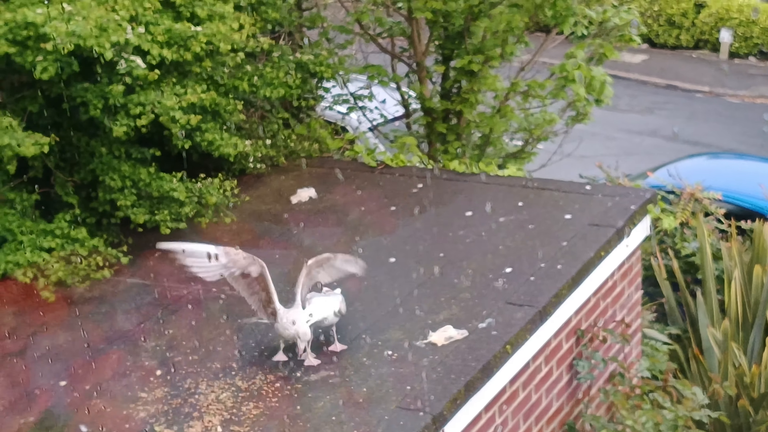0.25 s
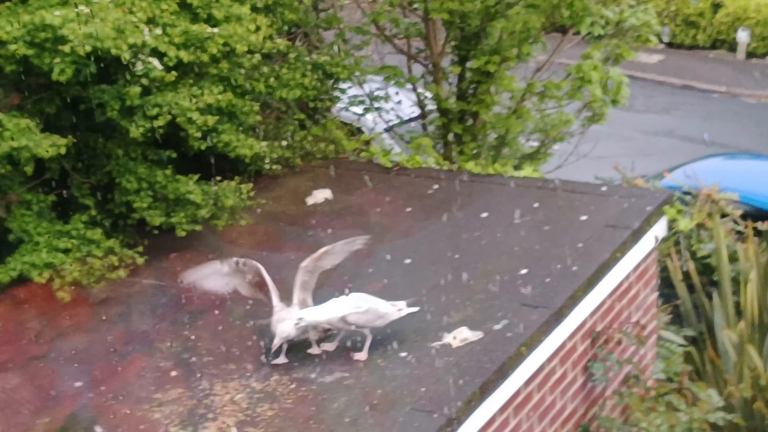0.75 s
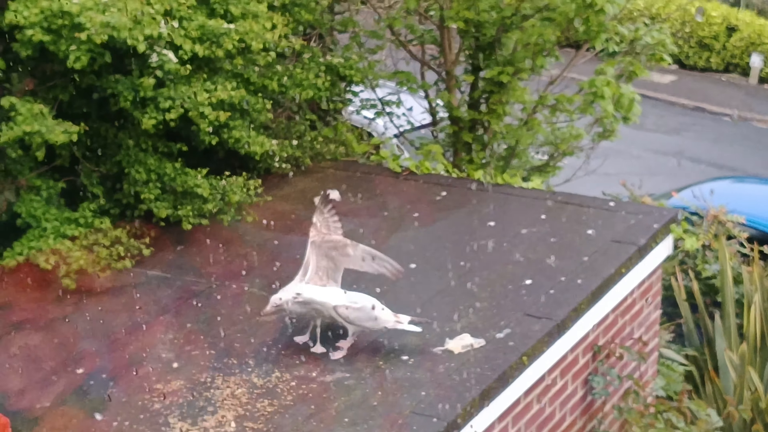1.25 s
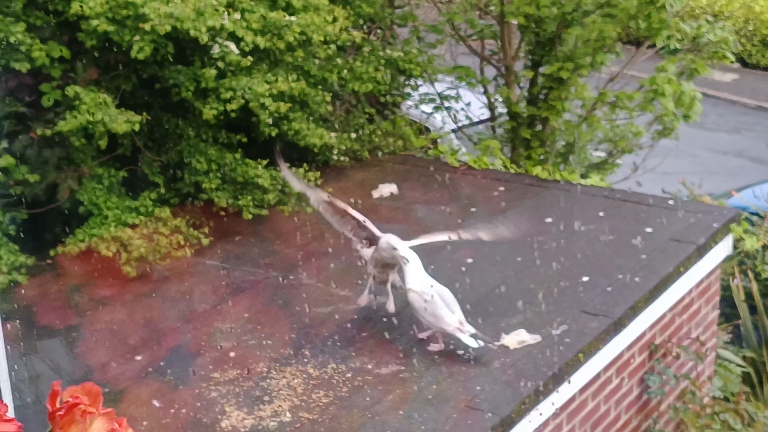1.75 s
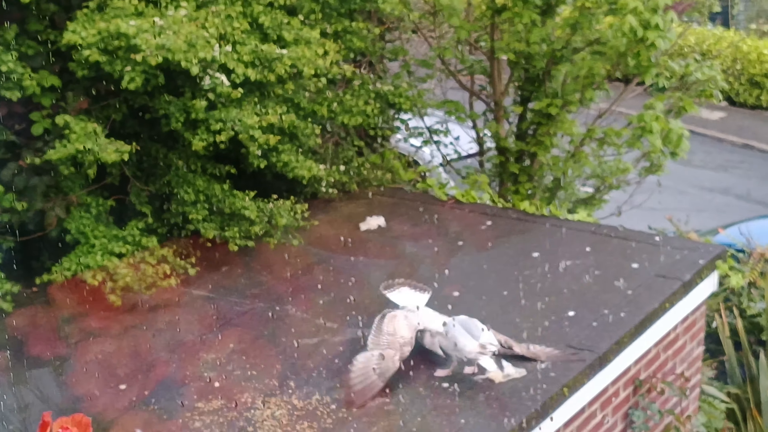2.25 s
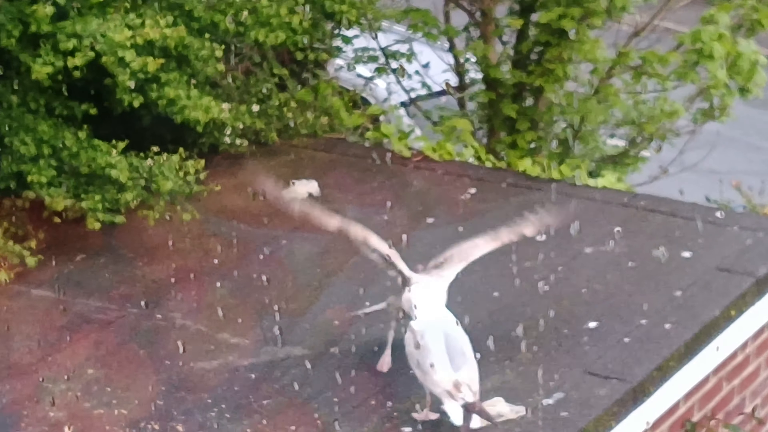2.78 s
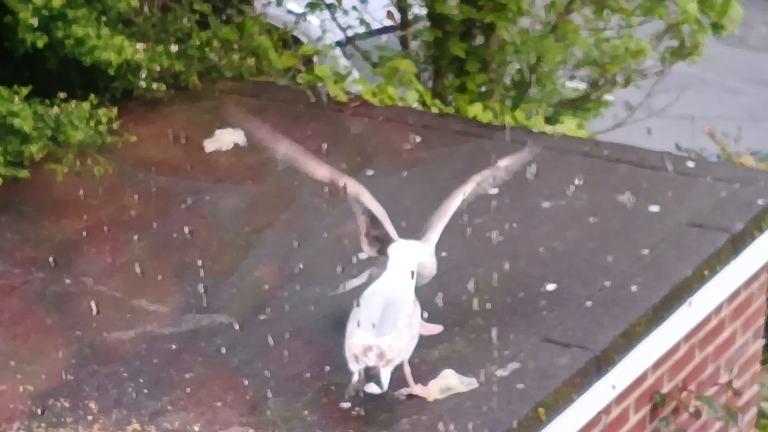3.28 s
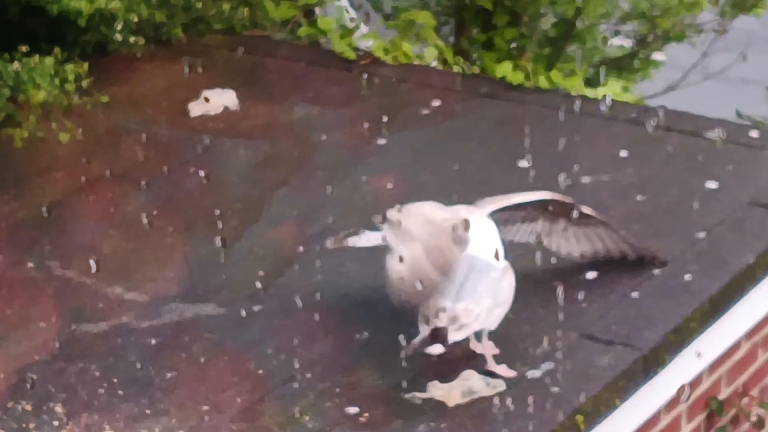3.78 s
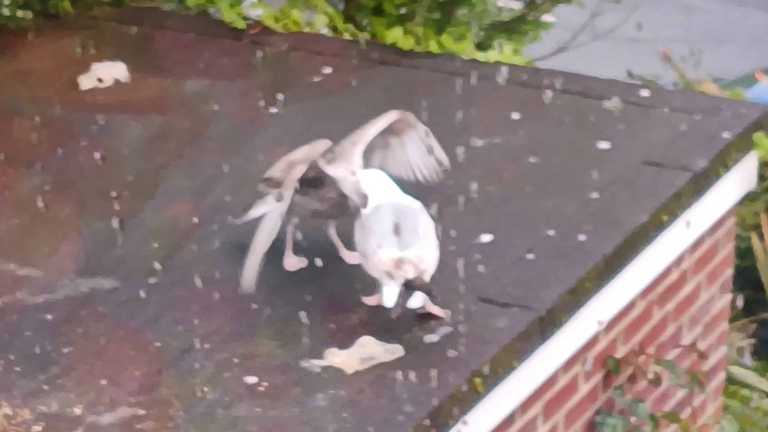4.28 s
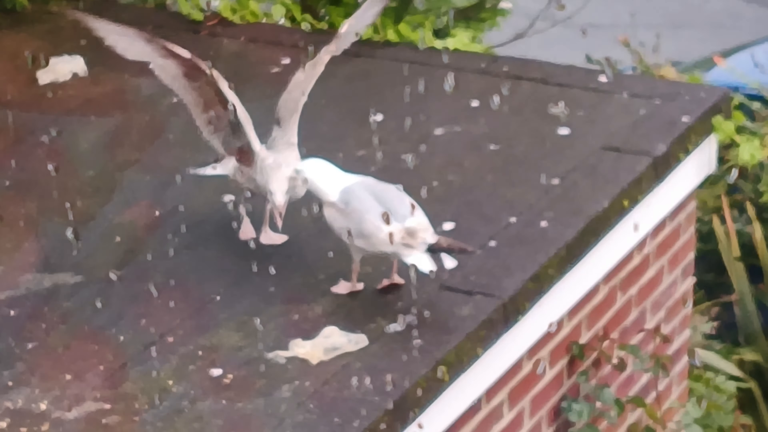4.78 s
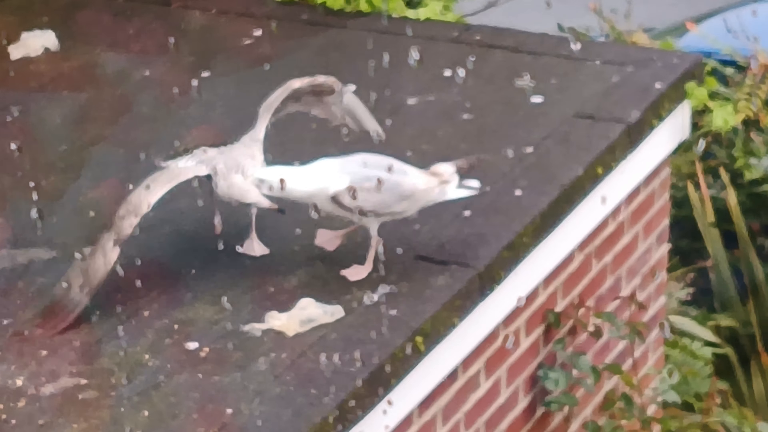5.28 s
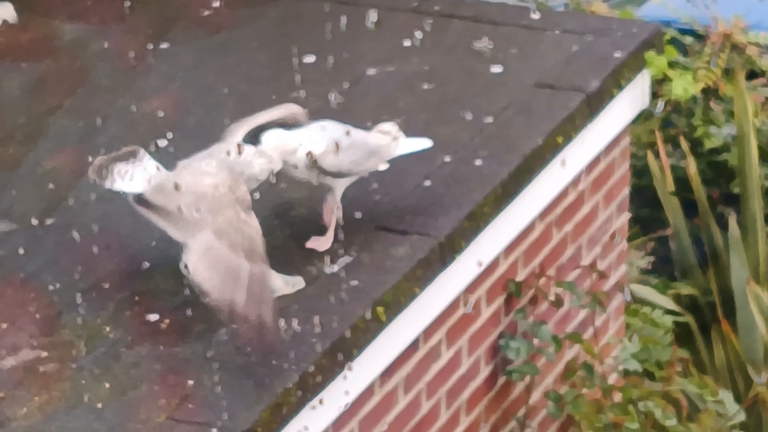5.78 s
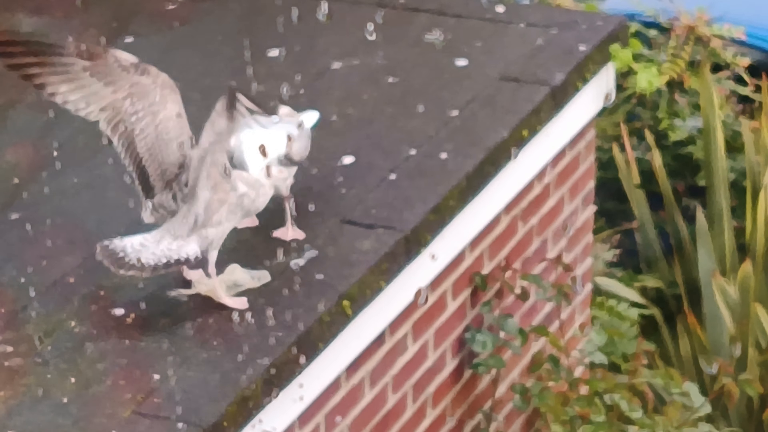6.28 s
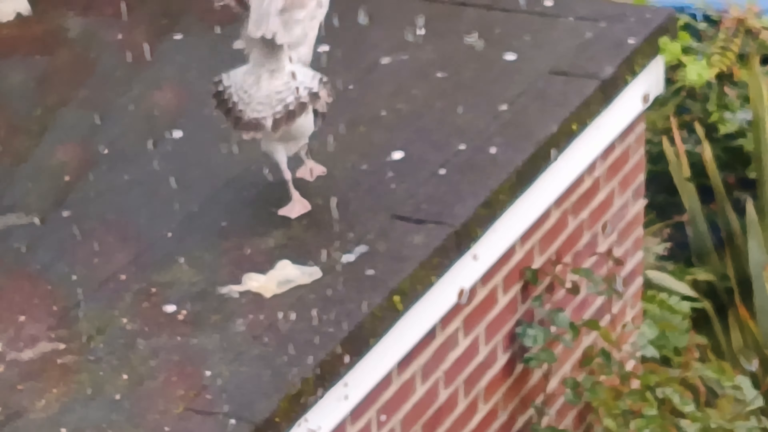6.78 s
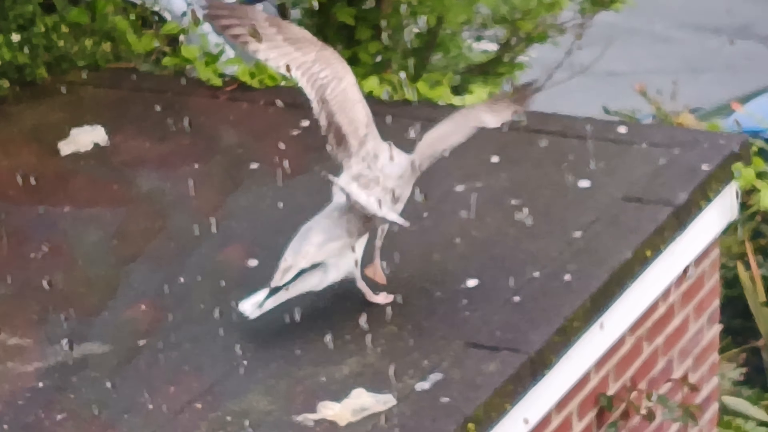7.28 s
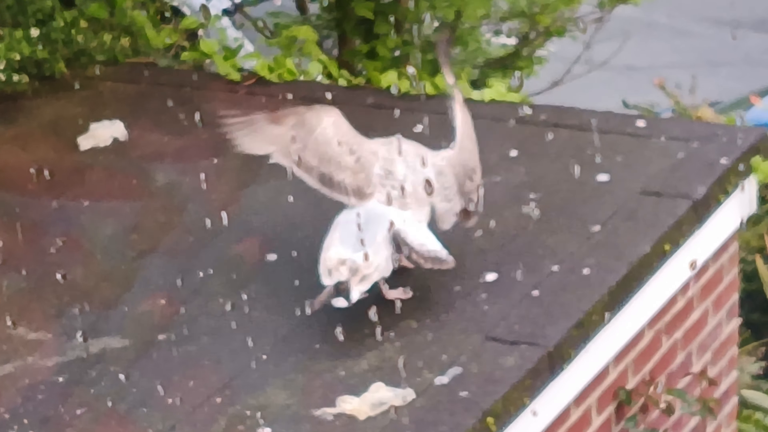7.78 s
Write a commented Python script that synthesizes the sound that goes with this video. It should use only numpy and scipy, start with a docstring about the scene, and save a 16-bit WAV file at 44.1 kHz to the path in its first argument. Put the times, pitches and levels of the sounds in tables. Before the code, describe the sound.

A young gull squeals again and again on a flat roof between houses, heard from a window with a slight wall echo. Short notes alternate with calls about a second long that crack in pitch and turn hoarse, loudest just past the middle. Feet and wings tap softly on the roof now and then. Far off, traffic hums and small birds chirp faintly under a thin hiss of drizzle and leaves.

```python
"""A young gull squeals on a flat roof between houses, heard from a window, with wall echoes.
Each call is a stack of overtones, a slower beat between them and a rasp of uneven membrane pulses;
the voice cracks to new pitches and turns hoarse under strain. Feet and wings tap the roofing felt
(noise bursts). Far off, small birds whistle and traffic hums under a hiss of drizzle and leaves."""
import sys
import numpy as np
from scipy import signal
from scipy.fft import rfft, irfft, next_fast_len
from scipy.io import wavfile
from scipy.ndimage import uniform_filter1d, minimum_filter1d, map_coordinates

SR = 44100
rng = np.random.default_rng(int(sys.argv[2]) if len(sys.argv) > 2 else 0)


def dump_mix(stems):
    """Bounce the given channels to the path in sys.argv[1] as a 16-bit WAV at rate SR."""
    frames = np.atleast_2d(stems).T  # one column per channel
    limited = np.clip(frames, -1, 1)  # hard clip at full scale
    pcm = np.round(limited * 32767).astype(np.int16)
    wavfile.write(sys.argv[1], SR, pcm)


N = 355005

# background trend: (time [s], traffic [dB], hiss [dB]), before fixed offsets
TOWN_LEVELS = [(0, -60.5, -78), (2.8, -63, -79.5), (3.201, -59.5, -71), (8.05, -59.5, -75)]
# traffic hum: (frequency [Hz], level [dB])
TRAFFIC_SPECTRUM = [(20, -4.5), (27, -18.5), (48, -4.5), (120, -5), (151, 0), (270, -20), (360, -14),
                    (416, -18.5), (517, -13), (576, -22), (955, -20.5), (1500, -37), (1950, -65),
                    (3300, -120)]
# drizzle and leaves: (frequency [Hz], level [dB])
HISS_SPECTRUM = [(530, -31.5), (900, -11), (1170, -4), (3120, -7), (3680, -5), (5010, -9), (13500, -12.5),
                 (15200, -26.5)]
# background stereo image: (frequency [Hz], left-right correlation [-1..1])
COHERENCE = [(60, 0.63), (240, 0.89), (940, 0.62), (3730, 0.088), (14800, -0.26)]
# street echo: (frequency [Hz], T60 [s])
STREET_DECAY = [(300, 0.23), (1500, 0.56), (4000, 0.4), (10000, 0.28)]
# colouring of the calls by the two microphone ports: (frequency [Hz], left over right [dB])
PORT_BALANCE = [(1500, -3), (3300, 2), (5200, -3.5), (7100, -18), (8300, 12.5), (10500, 8.5), (12000, -0.5)]
# far birds: (time [s], length [s], start pitch [Hz], end pitch [Hz], level [dB])
BIRD_CHIRPS = [(.02, 0.28, 4950, 4750, -65.5), (0.096, 0.054, 3020, 2180, -65),
               (2.235, 0.036, 8510, 8240, -67.5), (4.313, 0.051, 4940, 4810, -56.5),
               (5.59, 0.035, 5400, 4900, -56), (5.677, 0.028, 4800, 4550, -53.5),
               (5.704, 0.048, 4090, 4330, -51.5), (5.799, 0.036, 4090, 4740, -63),
               (7.405, 0.044, 2336, 2230, -58), (7.627, 0.11, 5810, 5780, -59.5)]
# feet and wings: (time [s], level [dB], thud gain [dB], tick gain [dB], tick centre [Hz])
ROOF_TAPS = [(0.183, -40, -14, -21, 9450), (2.4156, -57.5, -9, -9, 7700), (2.4757, -51.5, 4, -31, 7000),
             (4.048, -49.5, -18, -7.5, 8360), (4.3008, -51.5, 2, -12, 6700), (5.4199, -41, -29, -41, 7100),
             (6.943, -40, -9, -25.5, 8050), (7.1262, -56.5, -22.5, -6.5, 7400),
             (7.229, -44.5, 4.5, -8.5, 6930), (7.533, -43, 1, -13.5, 5650)]
# gull calls, one list per part, split at pitch breaks:
# (time [s], pitch [Hz], overtone 4 [dB], overtones 2, 3 and 6 over overtone 4 [dB])
CALL_CONTOURS = [
    [(0.22, 567, -78.5, 17, 12.5, -4), (0.244, 610.4, -52.5, 0.5, 4, -0.5),
     (0.276, 550.4, -41.5, -4, 3, -6.5), (0.32, 558, -43.5, -12.5, 2.5, -5.5),
     (0.358, 567, -46, -13.5, 1, -6), (0.422, 618.6, -39, -21.5, 0.5, 5)],
    [(0.423, 782.3, -44.5, -9, 3, -6.5), (0.5, 756, -42, -1.5, 9.5, 1.5), (0.56, 728.3, -30.5, -16, -5, -5),
     (0.61, 680, -30.5, -17.5, -10, -0.5), (0.64, 698.3, -36, -14, 1.5, 1.5),
     (0.665, 676.2, -40.5, -12.5, 11.5, 5), (0.76, 679.9, -33.5, -18, 7, 3),
     (0.82, 685, -35, -20.5, 6, 4.5), (0.9, 695.7, -34, -14.5, 6, 2.5), (0.95, 684.8, -31.5, -19, 1.5, -3),
     (0.98, 687.7, -24.5, -26.5, -20, -2), (1.015, 683.6, -33, -12, -2.5, 7),
     (1.06, 665, -38.5, -11.5, 13, 6.5), (1.085, 720, -41, -7.5, 11, -4),
     (1.12, 645.4, -35.5, -4, 4.5, -11.5), (1.15, 677, -69.5, 8.5, -11, 11)],
    [(1.655, 604, -81, 26.5, 3, -9), (1.685, 635, -72.5, 14, -8, -11), (1.7, 598.7, -37, 8.5, -10, -0.5),
     (1.745, 608.2, -30.5, 0, -38, 2), (1.8, 633.5, -32, -4, -27, -4.5),
     (1.822, 640.7, -33, 0.5, -10.5, -7), (1.85, 643.7, -38.5, -7, -16, 10), (1.89, 647, -44, 7, 0.5, -10),
     (1.915, 629, -45, 5.5, -8, 0), (1.935, 611, -44.5, 0, -8, 6), (1.96, 627, -61, 12, -3, -24)],
    [(2.885, 602, -71, 16, 22.5, -15), (2.915, 618.4, -54, 14, 0, -2), (2.96, 664, -35, -16, -2, -30),
     (3.005, 657.6, -45, 0.5, 3, -6), (3.05, 564, -40.5, -16, -1.5, 1), (3.092, 583.3, -48.5, 7, 7.5, 9.5)],
    [(3.094, 720.5, -31.5, -11, -20.5, -24.5), (3.17, 740.7, -49.5, 9, 14, -15.5),
     (3.24, 730.5, -44.0, 7, -1, -7), (3.3, 727, -33, -9, -4.5, -11), (3.38, 743.5, -28, -3.5, -13.5, -9.5),
     (3.43, 758.4, -27.5, -8.5, -19, -11), (3.51, 730.2, -31.5, -7, -12.5, -2),
     (3.58, 777, -32.5, -0.5, -24, 3), (3.645, 797.4, -30, 11, -21, 2), (3.7, 791.5, -29.5, -4.5, -22, 2),
     (3.75, 792.6, -29, -16, -13.5, -3.5), (3.82, 805.2, -25, -5.5, -17, -6),
     (3.89, 769, -32.5, 4, 3, -9.5), (3.915, 755.5, -48.5, 5, 3.5, 0), (3.94, 744, -55.5, 1, -3, -4.5)],
    [(4.425, 638, -69.5, 14.5, 18.5, 2.5), (4.47, 608, -35.5, -5, -3, -11),
     (4.52, 636.5, -32, -7.5, -6.5, -14.5), (4.567, 689, -34.5, -25, 3.5, -3.5)],
    [(4.569, 808, -35, -11.5, -4.5, -3), (4.66, 832, -28, -12, -9, -7), (4.73, 759, -26.5, -13, -2, -6.5),
     (4.79, 750, -21, -14.5, -14, -2), (4.83, 725.7, -22, -21, -17, -1), (4.92, 727.3, -9, -29, -16.5, -10),
     (4.965, 728, -13.5, -24.5, -17.5, -18), (4.99, 714, -17, -15, -12.5, -7),
     (5.06, 698.3, -21.5, -5.5, -17.5, 3), (5.11, 681, -17.5, -14, -18, 1),
     (5.15, 673, -26.5, -10.5, -5, 4.5), (5.2, 656.2, -24.5, -8, -7.5, 4),
     (5.28, 643.4, -19.5, -6.5, -16, -1.5), (5.32, 602.5, -34.5, -11, -11, 6),
     (5.35, 593, -50, -25, 1, -21)],
    [(5.83, 582, -69, 1.5, 11, -9), (5.845, 573.4, -51.5, 8.5, 15, -2), (5.87, 607, -31.5, 5.5, 6.5, 0.5),
     (5.898, 620.7, -25.5, 6.5, -18.5, 2), (5.925, 613, -32.5, 4, 5.5, -5),
     (6.035, 600.7, -28, -1.5, -5, -1), (6.075, 627.7, -38.5, -0.5, 1, -0.5),
     (6.12, 648, -38.5, 10, -13, 9.5), (6.165, 644.8, -26, 2, -18, -14.5),
     (6.235, 662.8, -23, -24, -5, -8.5), (6.3, 654.1, -16.5, -20.5, -27, -18.5),
     (6.35, 649.2, -31, -12, -28, 3), (6.43, 651.5, -23, -4.5, -30, -6.5), (6.52, 672.2, -36, 3, -39, 11.5),
     (6.56, 657, -34.5, -6, -35, 5), (6.578, 655.4, -25.5, -7.5, -43, 4.5),
     (6.61, 630.5, -33.0, 10, -35, 6), (6.64, 621.3, -38, 1, 1.5, 9), (6.68, 651, -49.5, 3, 1, 7)],
    [(7.735, 597, -52, 11.5, 1, -31), (7.75, 624, -38, 4.5, -16, 0.5), (7.79, 660, -27.5, -24, -12.5, -3),
     (7.82, 598.3, -31.5, -5.5, -34, -3.5), (7.84, 606, -49.5, -27, -31, 7.5),
     (7.87, 592, -41, -24, -25, 0.5)],
    [(8.03, 500, -71.5, -3, -24, 5), (8.049, 517, -33, -17, -28.5, -5.5)],
]
# one row per part: (slow-beat period [cycles], left lag [ms], left over right [dB],
# beak treble above 7 kHz [dB], overtone 1 lift [dB], lift from overtone 7 up [dB],
# rasp lift near 9 kHz [dB], rasp over voice [dB], period doubling [dB], odd lift from overtone 5 up [dB])
CALL_SETTINGS = [(2, .05, -2.5, 11, -4.5, 4.5, -4, -16, -34.5, -1.5),
                 (2, .025, -2.5, -7.5, -20, 4, 10, -24.5, -9.5, -3),
                 (3, .05, 0.5, 1, -13.5, -0.5, 23, -23, -13.5, 3), (2, .05, 0, 9, -6, -8, 11, -22, -29, -2),
                 (2, 0.2, -1, 0, -7.5, -8.5, 8, -19.5, -13, 4),
                 (2, .16, -0.5, 12.5, -2, -4.5, -17, -20, -30.5, 4.5),
                 (2, .06, -0.5, -6, -18.5, 9.5, -6.5, -28.5, -26, 1.5),
                 (2, 0.15, 1, -5, -24.5, -1, -17, -34, -14, -4.5),
                 (2, 0.13, -2, 10.5, -13, -5.5, 2, -23.5, -31.5, 4),
                 (2, .16, 8, 14, -10, 0.5, 0, -43, -25, -2)]
# loss of the steady cycle: (start [s], end [s], hoarseness [0..1])
HOARSE_SPANS = [(.24, .29, .14), (.29, .42, .08), (.42, .52, .55), (.52, .63, .18), (.63, .93, .07),
                (1.07, 1.16, .2), (1.77, 1.86, .14), (1.86, 1.97, .24), (2.88, 3.02, .12), (3.02, 3.09, .3),
                (3.09, 3.26, .5), (3.26, 3.53, .26), (3.85, 3.95, .2), (4.42, 4.52, .28), (4.52, 4.68, .62),
                (4.68, 4.82, .4), (4.99, 5.1, .14), (5.3, 5.36, .2), (5.86, 5.92, .1), (5.915, 6.1, .34),
                (6.62, 6.68, .14), (7.77, 7.88, .06)]
# slow beat comes forward: (start [s], end [s], boost [dB])
BEAT_BOOSTS = [(0.629, .72, 9.5), (0.809, .92, 7), (1.81, 1.832, 7), (1.866, 1.921, 17.5)]
# envelope of the high overtones: (frequency [Hz], level [dB])
UPPER_SPECTRUM = [(3500, 18.5), (5000, -1), (6500, -18.5), (8500, -22.5), (10500, -27.5), (12000, -39.5),
                  (15000, -42)]
# throat colour of the rasp: (frequency [Hz], level [dB])
RASP_SPECTRUM = [(350, -35), (700, -20.5), (1000, -32.5), (1400, -14.5), (2200, -1), (3200, -5), (4500, 0),
                 (5600, 0.5), (6500, -28.5), (8500, -23.5), (10500, -25.5), (15000, -45.5)]

HOP = 32  # samples per control step of the voice


def amp(db):
    """Decibels to gain."""
    return 10 ** (np.asarray(db) / 20)


def unit(x):
    """Scale to rms 1."""
    return x / np.sqrt(np.mean(x ** 2) + 1e-20)


def along(points, hz):
    """Interpolate (frequency [Hz], value) points on a log axis."""
    knots_hz, values = np.transpose(points)
    return np.interp(np.log(hz + 1), np.log(knots_hz + 1), values)


def wobble(rate_hz, size):
    """Smooth random curve, rate_hz knots a second."""
    knots = rng.standard_normal(int(size * rate_hz / SR) + 4)
    return map_coordinates(knots, [np.arange(size) * rate_hz / SR])


def spans(rows, t, smooth_steps):
    """Smoothed sum of (start [s], end [s], value) blocks."""
    blocks = sum(value * ((t >= start) & (t < end)) for start, end, value in rows)
    return uniform_filter1d(blocks, smooth_steps)


def filtered(x, response):
    """Apply the gain response(hz) by FFT."""
    size = next_fast_len(x.shape[-1] + 8192)
    return irfft(rfft(x, size) * response(np.fft.rfftfreq(size, 1 / SR)), size)[..., :x.shape[-1]]


def tail(decay, length_s):
    """Stereo echo tail of about unit energy; decay is (frequency [Hz], T60 [s])."""
    hz, t, noise = signal.stft(rng.standard_normal((2, int(length_s * SR))), SR, nperseg=256)
    out = signal.istft(noise * amp(-60 * t / along(decay, hz)[:, None]), SR, nperseg=256)[1]
    return out / np.linalg.norm(out[0])


def echoes(x, lag_ms, near_db, street_db):
    """Direct sound, later at the left port, plus near walls and the street's longer echo."""
    impulse = amp(street_db) * np.pad(tail(STREET_DECAY, length_s=.7), ((0, 0), (1300, 0)))
    near = amp(near_db) * tail([(1000, .16), (8000, .093)], length_s=.1)
    impulse[:, 130:130 + near.shape[1]] += near
    impulse[0, round(lag_ms * SR / 1000)] = impulse[1, 0] = 1
    return signal.oaconvolve(x[None], impulse, axes=1)


def rush(spectrum, patchy_db):
    """Stereo noise of rms 1, its gain patchy in time and frequency."""
    noise = signal.stft(rng.standard_normal((2, N)), nperseg=512)[2]
    patches = uniform_filter1d(rng.standard_normal(noise.shape[1:]), size=6, axis=0)
    patches = uniform_filter1d(patches, size=12, axis=1)
    pair = signal.istft(noise * amp(patchy_db * unit(patches)), nperseg=512)[1][:, :N]
    angle = lambda f: np.arccos(along(COHERENCE, f)) / 2
    mid, side = filtered(pair, lambda f: amp(along(spectrum, f)) * [np.cos(angle(f)), np.sin(angle(f))])
    return unit(np.array([mid + side, mid - side]))


def town():
    """Distant traffic under a thin hiss of drizzle and leaves."""
    times_s, traffic_db, hiss_db = np.transpose(TOWN_LEVELS)
    t = np.arange(N) / SR
    traffic_gain = amp(np.interp(t, times_s, traffic_db) + 5.5 + .52 * wobble(11, N))
    hiss_gain = amp(np.interp(t, times_s, hiss_db) + 9.5)
    traffic = traffic_gain * rush(TRAFFIC_SPECTRUM, patchy_db=1.54)
    return traffic + hiss_gain * rush(HISS_SPECTRUM, patchy_db=3.5)


def far_birds():
    """Thin gliding whistles, blurred by distance."""
    out = np.zeros(N + SR)
    for start_s, length_s, from_hz, to_hz, db in BIRD_CHIRPS:
        progress = np.arange(int(length_s * SR)) / (length_s * SR)
        hz = (from_hz + (to_hz - from_hz) * progress) * (1 + .0165 * wobble(80, len(progress)))
        envelope = amp(db) * np.sqrt(2 * np.sin(np.pi * progress))
        out[round(start_s * SR):][:len(hz)] += envelope * np.sin(2 * np.pi * np.cumsum(hz) / SR)
    return signal.fftconvolve(out[None], tail([(1000, .05)], length_s=.26), axes=1)[:, :N]


def roof_taps():
    """Each touch: a dull thud on the roof, a soft slap of feathers, a gritty tick."""
    out, t = np.zeros(N + SR), np.arange(SR // 5) / SR
    decay = lambda db, t60_s: amp(db - 60 * t / t60_s)
    for start_s, db, thud_db, tick_db, tick_hz in ROOF_TAPS:
        noise = rng.standard_normal((3, len(t))) * (1 - np.exp(-t / .0036))
        thud = unit(filtered(noise[0], lambda f: (f > 90) / (1 + (f / 450) ** 4)))
        slap = unit(filtered(noise[1], lambda f: 1 / (1 + (f / 4000) ** 6) / (1 + (1500 / (f + 1)) ** 4)))
        tick = unit(filtered(noise[2], lambda f: 1 / (1 + ((f - tick_hz) / 1100) ** 2)))
        touch = decay(thud_db, .12) * thud + decay(-8.5, .18) * slap + decay(tick_db + 10.5, .06) * tick
        out[round(start_s * SR):][:len(t)] += amp(db) * touch
    return out[:N]


def beak_db(hz, treble_db):
    """Shelf above 7 kHz, raised when the open beak faces the window."""
    return treble_db / (1 + (7000 / (hz + 1)) ** 12)


def dip_near_1khz(hz, centre_hz=1014, width_hz=71, depth=.55):
    """A narrow dip in the call's tone near 1 kHz."""
    return 1 - depth * np.exp(-((hz - centre_hz) / width_hz) ** 2)


def membrane_rasp(phase, strength, beat_ratio, treble_db, air_db):
    """Chaotic membrane: sharp cycles, strong and weak in turn, a puff of air in each; rms 1."""
    opening = np.exp(12 * np.cos(phase))
    pulses = unit(opening * strength * (1 + np.sin(beat_ratio * phase)))
    puffs = unit(np.sqrt(opening) * rng.standard_normal(len(phase)))
    air_band = lambda f: np.exp(-((f - 9200) / 2200) ** 4)
    throat = lambda f: amp(along(RASP_SPECTRUM, f) + beak_db(f, treble_db) + air_db * air_band(f))
    return unit(filtered(pulses + .35 * puffs, throat))


def squeal(contour, beat_ratio, treble_db, first_lift_db, upper_db, air_db, rasp_db, doubling_db, odd_db):
    """One part of a call: 22 overtones, a slower beat between them, and rasp that grows with strain."""
    times_s, *columns = np.transpose(contour)
    t = np.arange(times_s[0], times_s[-1], 1 / SR)
    control_t = t[::HOP]
    fine = lambda curve: np.interp(t, control_t, curve)
    drift = lambda rate_hz: wobble(HOP * rate_hz, len(control_t))
    pitch_hz, fourth_db, *relative_db = [np.interp(control_t, times_s, column) for column in columns]

    # Strain jitters the cycle; odd overtones, from every second cycle, slip against the even ones.
    hoarse = spans(HOARSE_SPANS, control_t, smooth_steps=40)
    strain = .09 + hoarse
    jitter_rad = fine(.45 * strain ** 1.5 * drift(330))
    slip_rad = fine(2.2 * np.clip(6 * hoarse - .6, 0, 1) * drift(170))
    phase = 2 * np.pi * np.cumsum(fine(pitch_hz * (1 + .003 * drift(35.02)))) / SR

    second_db, third_db, sixth_db = fourth_db + np.array(relative_db)
    first_db = third_db + first_lift_db
    fifth_db = third_db + (sixth_db - fourth_db) / 2 - 4 + odd_db
    levels_db = [first_db - 5, second_db, third_db, fourth_db, fifth_db, sixth_db]
    for k in range(7, 23):
        base_db = third_db + odd_db if k % 2 else sixth_db
        slope_db = along(UPPER_SPECTRUM, k * pitch_hz) - along(UPPER_SPECTRUM, 6 * pitch_hz)
        levels_db.append(base_db + slope_db + beak_db(k * pitch_hz, treble_db) + upper_db)

    flutter_db = 2.5 * strain * drift(160)
    tone = np.zeros(len(t))
    for k, db in enumerate(levels_db, 1):
        waver_db = 1.9 * np.sqrt(k / 4) * drift(60.02)
        angle = k * (phase + jitter_rad) + (slip_rad if k % 2 and k > 1 else 0)
        tone -= np.sqrt(2) * fine(amp(db + flutter_db + waver_db)) * np.cos(angle)

    # Slow beat: weak in a clear voice; the throat passes little below its first resonance.
    clarity = np.clip(1 - 10 * hoarse, 0, 1)
    beat_db = doubling_db - 22 * clarity + spans(BEAT_BOOSTS, control_t, smooth_steps=10)
    beat = fine(amp(beat_db + 3 * drift(30))) * np.sin(beat_ratio * phase + fine(1.5 * drift(40)))
    sidebands = filtered(tone * beat, lambda f: 1 / (1 + (1250 / (f + 1)) ** 16))
    undertone = fine(amp(first_db - 4.5)) * beat

    pulse_phase = phase + fine(.7 * drift(200))
    pulse_strength = fine(amp(4.5 * drift(320)))
    rasp = membrane_rasp(pulse_phase, pulse_strength, beat_ratio, treble_db, air_db)
    voice_db = fourth_db + 10 * np.log10(1 + sum(amp(db) ** 2 for db in relative_db))
    rasp *= fine(amp(voice_db + rasp_db + 30 * strain + 1.8 * drift(30)))

    still_calling = t[-1] > 8  # no fade-out on the last call
    fade = np.clip(np.minimum(t - t[0], t[-1] - t + still_calling) / .004, 0, 1)
    return fade * filtered(tone + sidebands + undertone + rasp, dip_near_1khz)


def gull():
    """Squeals from the roof, each part with its own random wall echoes and stereo position."""
    out = np.zeros((2, N))
    for contour, (cycles, lag_ms, pan_db, *timbre_db) in zip(CALL_CONTOURS, CALL_SETTINGS):
        start = round(contour[0][0] * SR)
        call = squeal(contour, 1 - 1 / cycles, *timbre_db)
        call = echoes(call, lag_ms, near_db=-2, street_db=-15.5)
        call = filtered(call, lambda f: amp(np.outer([.5, -.5], along(PORT_BALANCE, f))))[:, :N - start]
        out[:, start:start + call.shape[1]] += amp([[pan_db / 2], [-pan_db / 2]]) * call
    return out


def scene():
    """Stereo mix of town, far birds, taps and gull."""
    background = town() + far_birds()
    taps = echoes(roof_taps(), lag_ms=.13, near_db=-4.5, street_db=-21.5)[:, :N]
    return background + taps + gull()


def record(dry):
    """Peak limiter, then a brick-wall low-pass."""
    ceiling, cutoff_hz = .88, 15450
    needed_gain = np.minimum(1, ceiling / (np.abs(dry).max(axis=0) + 1e-9))
    gain = uniform_filter1d(minimum_filter1d(needed_gain, size=801), size=400)
    return filtered(dry * gain, lambda f: f < cutoff_hz)


dry = scene()
out = record(dry)
dump_mix(out)
```